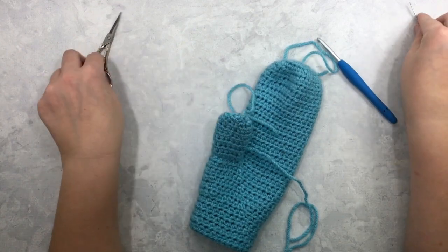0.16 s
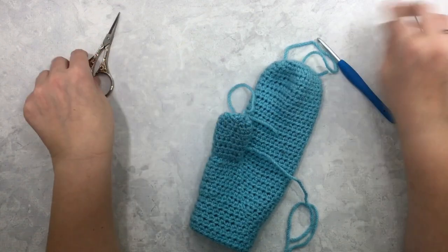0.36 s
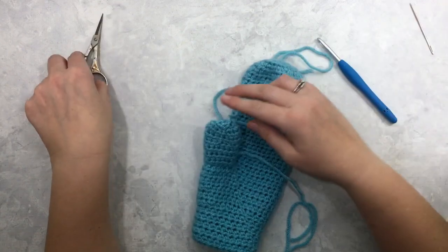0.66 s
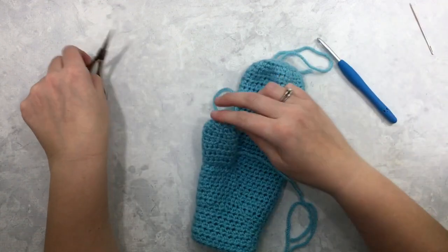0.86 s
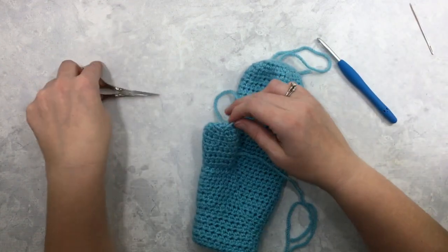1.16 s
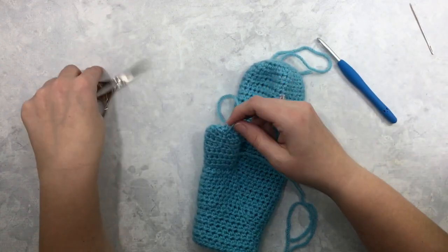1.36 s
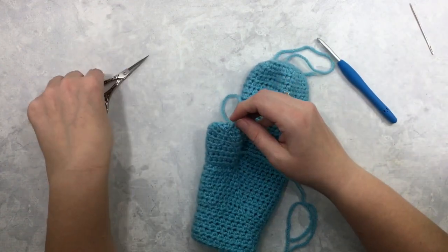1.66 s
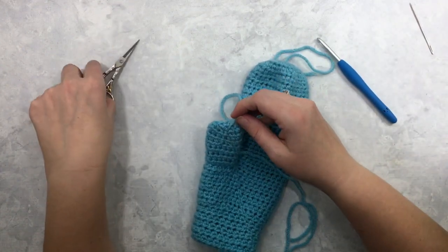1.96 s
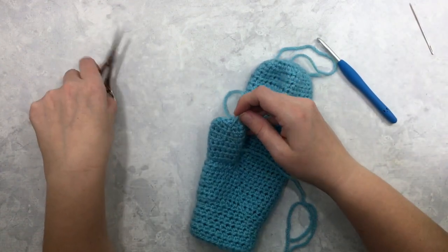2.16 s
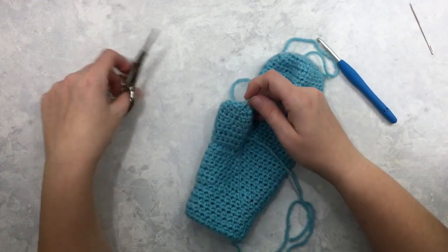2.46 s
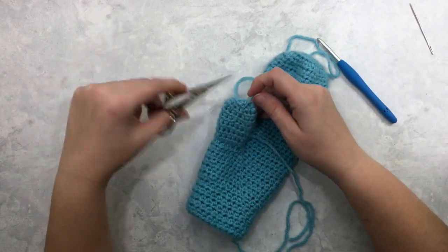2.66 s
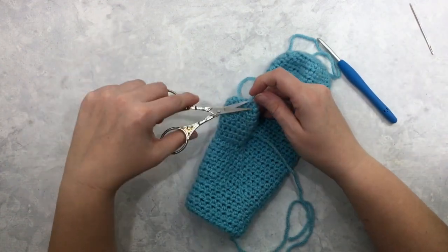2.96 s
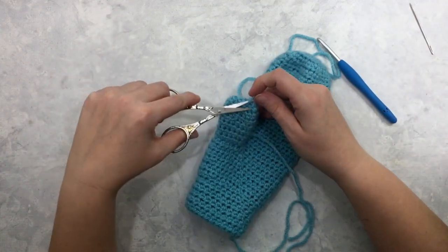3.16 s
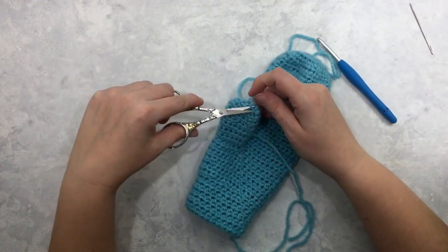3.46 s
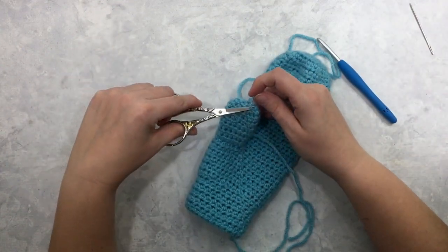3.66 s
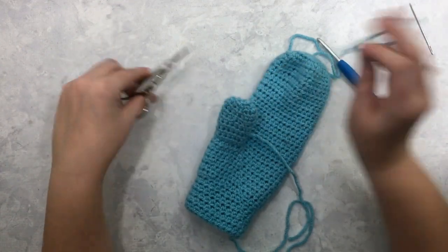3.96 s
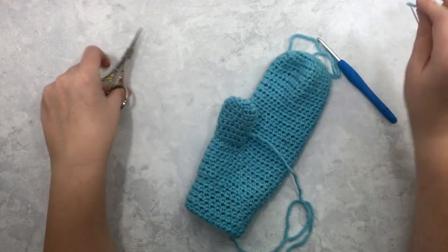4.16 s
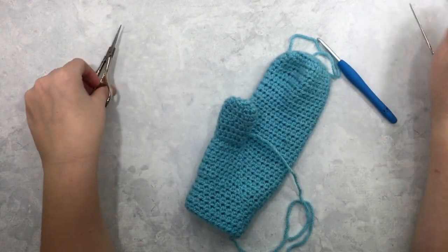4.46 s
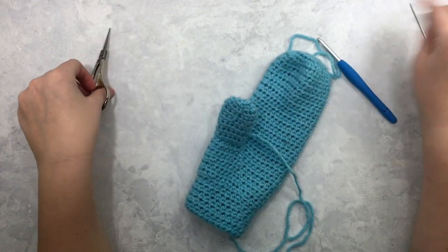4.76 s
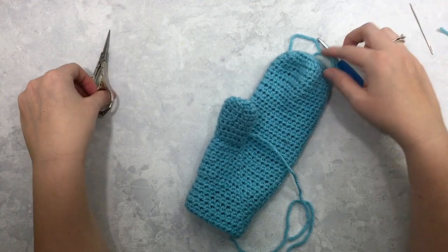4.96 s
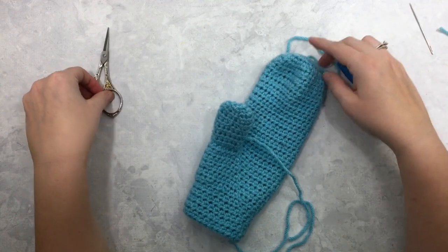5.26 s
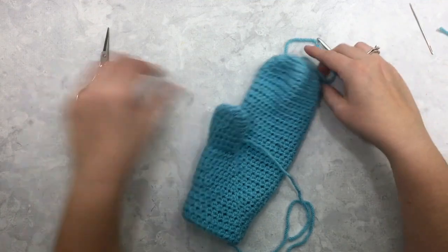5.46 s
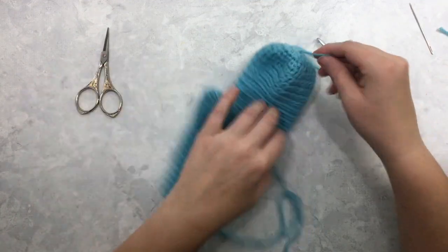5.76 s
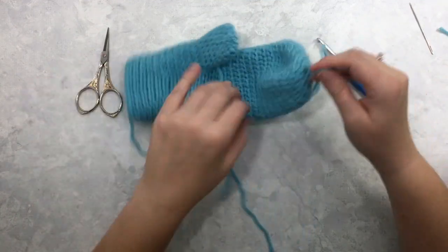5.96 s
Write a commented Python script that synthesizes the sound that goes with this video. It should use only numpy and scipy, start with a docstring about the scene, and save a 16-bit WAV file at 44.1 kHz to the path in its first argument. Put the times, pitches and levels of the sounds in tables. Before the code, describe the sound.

In a quiet room, close to the microphone, small steel scissors are fumbled on a hard tabletop with chinks, clacks, short scrapes and dull thumps, while hands softly pat a crocheted mitten. The handling thins out, near silence follows with faint wool cuts, then a single sharp, high snip. After another lull the scissors clack down on the table, and the mitten is rustled and patted.

```python
"""Small steel scissors are picked up from a table, snip a strand of yarn and are laid down again.
Each blow sums noise bursts with damped modes of steel and table top; scrapes drive modes with friction noise.
The snip is shaped noise ringing the blades; hands pat and brush a crocheted mitten as soft pushes and slips.
A quiet room of filtered noise hums behind, with near reflections and a short diffuse tail on the sources.
The close microphone's gain control ducks after each loud knock and recovers."""
import sys
import numpy as np
from scipy import signal
from scipy.fft import rfft, irfft
from scipy.io import wavfile
from scipy.ndimage import uniform_filter1d

SR = 44100
rng = np.random.default_rng(int(sys.argv[2]) if len(sys.argv) > 2 else 0)


def materialize(psi):
    """Save the field psi as 16-bit PCM at rate SR to the path in sys.argv[1].

    A 1-D psi becomes a single channel; in a 2-D psi each row is a channel.
    """
    bounded = np.clip(np.atleast_2d(psi).T, -1, 1)
    quanta = np.round(bounded * 32767).astype(np.int16)
    wavfile.write(sys.argv[1], SR, quanta)


N = 269010
TIME = np.arange(N) / SR  # s

# modes of the table top, deep ones first: f/Hz, relative level/dB, t60/s
TABLE_MODES = [(107, -6, .17), (131, 1, .19), (155, -4, .13), (197, -6, .12), (230, -2, .16),
               (270, -8, .14), (312, -1, .19), (345, -6, .28), (424, -11, .13), (512, -4, .1),
               (541, -1, .15), (625, 0, .14), (670, -9, .07), (726, -1, .15), (825, -11, .13),
               (873, -13, .11), (920, -14, .11), (1040, -19, .11), (1232, -22, .11)]
# colour of the table's quickly damped modes: f/Hz, gain/dB
BODY_COLOUR = [(150, -18.5), (300, -2.5), (550, 6.5), (750, -1.5), (950, -6.5), (1300, -15.5), (2200, -17),
               (5000, -51.5)]


def amp(db):
    """Level to amplitude: 20 dB is a factor of ten."""
    return 10 ** (np.asarray(db) / 20)


def unit(x):
    """Power normalization: scales to rms 1."""
    return x / np.sqrt(np.mean(x ** 2) + 1e-20)


def crest(x, size):
    """Short-time power normalization: the loudest stretch of size samples gets rms 1."""
    power = uniform_filter1d(x ** 2, size, mode="constant")
    return x / np.sqrt(power.max() + 1e-20)


def read(points, hz):
    """Interpolation of a spectrum along a logarithmic frequency axis."""
    f, value = np.transpose(points)
    return np.interp(np.log(hz + 1), np.log(f + 1), value)


def add(mix, s, sound):
    """Superposition: mixes a sound in at time s."""
    part = mix[max(round(s * SR), 0):][:len(sound)]
    part += sound[:len(part)]


def colour(x, points, size=4096):
    """Minimum-phase filtering: the log gain and its Hilbert transform give a causal response."""
    hz = abs(np.fft.fftfreq(size, 1 / SR))
    log_gain = np.log(amp(read(points, hz)))
    spectrum = np.exp(np.conj(signal.hilbert(log_gain)))
    taps = np.fft.ifft(spectrum).real[:size // 2]
    return signal.fftconvolve(x, taps)[:len(x)]


def low_cut(x, hz, order):
    """High-pass filtering: removes the bass below hz."""
    return signal.sosfilt(signal.butter(order, hz, "high", fs=SR, output="sos"), x)


def burst(points, decay_s, size=8192):
    """High modal density: many quickly damped modes act as decaying noise with the given colour."""
    decay = np.exp(-np.arange(size) / SR / decay_s)
    return colour(rng.standard_normal(size) * decay, points)


def ring(modes, spot_db=0, spot_phase=0, detune=0.011, size=22050):
    """Modal decay: the spot struck sets each mode's strength and phase."""
    t = np.arange(size) / SR
    out = np.zeros(size)
    # each mode's pitch varies a little at random, so repeated blows sound less tonal
    spots = (2 * rng.random((len(modes), 3)) - 1) * [spot_db, spot_phase, detune]
    for (hz, db, t60), (more_db, phase, shift) in zip(modes, spots):
        decay = amp(db + more_db - 60 * t / t60)
        build_up = np.minimum(2 * hz * t, 1)  # half a cycle
        out += decay * build_up * np.sin(2 * np.pi * hz * (1 + shift) * t + phase)
    return out


def excite(drive, modes):
    """Forced vibration: the drive passes through a modal response of unit energy."""
    response = np.diff(ring(modes, spot_phase=np.pi, detune=0))
    return signal.fftconvolve(drive, response / np.linalg.norm(response))[:N]


def grains(per_s, spread_db, smooth):
    """Stick-slip friction: tiny slips of uneven size over a smooth hiss."""
    happens = rng.random(N) < per_s / SR
    size = amp(spread_db * np.minimum(rng.exponential(1, N), 4))
    slips = happens * rng.choice([-1, 1], N) * size
    return unit(unit(slips) + smooth * rng.standard_normal(N))


def stroke(s, swell, fade):
    """Transient load: pressure builds up to time s and lets go, each side a half Gaussian."""
    return np.exp(-((TIME - s) / np.where(TIME < s, swell, fade)) ** 2)


def pressures(rows):
    """Incoherent addition: overlapping strokes add in power, one gain curve per level column."""
    shapes = np.array([stroke(*row[:3]) for row in rows])
    levels = amp(np.array(rows)[:, 3:])
    return np.sqrt(levels.T ** 2 @ shapes ** 2)


def air():
    """Stationary noise: steady room rumble and microphone hiss."""
    # background spectrum: f/Hz, relative level/dB
    air_colour = [(15, -39.5), (25, -8.5), (55, -1), (129, -5), (169, -14.5), (313, -22.5), (421, -26.5),
                  (684, -26), (782, -29), (2120, -33), (2490, -32.5), (2700, -35.5), (10600, -40),
                  (13500, -38.5), (15500, -44)]
    hz = np.fft.rfftfreq(N, 1 / SR)
    spectrum = rfft(rng.standard_normal(N)) * amp(read(air_colour, hz))
    return amp(-50.5) * unit(irfft(spectrum, N))


def room(x, tail_db=-15, size=22050):
    """Reverberation: a few near reflections and a diffuse tail whose decay depends on frequency."""
    # decay of the tail: f/Hz, t60/s
    decay_times = [(100, 0.62), (400, 0.32), (1500, 0.28), (5000, 0.2), (15000, 0.15)]
    # near reflections: delay t/s, level/dB
    reflections = [(.0062, -25), (0.0109, -18), (0.0176, -22.5)]
    hz, t, z = signal.stft(rng.standard_normal(size), SR, nperseg=256)
    decay = amp(-60 * t / read(decay_times, hz)[:, None])
    tail = signal.istft(z * decay, SR, nperseg=256)[1]
    tail *= np.minimum(np.arange(len(tail)) / SR / 0.013, 1)  # builds up over 13 ms
    tail *= amp(tail_db) / np.linalg.norm(tail)
    for s, db in reflections:
        add(tail, s, amp(db) * np.array([.5, .5]))  # the two-sample mean loses the top treble
    return x + signal.fftconvolve(x, tail)[:N]


def rustle(points, effort, rest_db, slips, uneven_db):
    """Modulated friction: fibres or skin catch and slip under an unsteady hand."""
    slow = uniform_filter1d(uniform_filter1d(rng.standard_normal(N), 700), 500)
    waver = amp(uneven_db * unit(slow))
    pressure = np.hypot(effort, amp(rest_db))  # the hands never hold quite still
    return unit(colour(slips, points)) * pressure * waver


def hands():
    """Sliding friction: sparse slips of wool fibres and denser slips of skin on the table."""
    # sweeps: t/s of the peak, swell t/s, fade t/s, wool level/dB, skin level/dB (before wavering)
    sweeps = [(0.03, 0.039, 0.092, -59, -59), (0.23, 0.066, 0.085, -60, -55.5),
              (0.45, 0.051, 0.046, -54, -57), (0.58, 0.051, 0.028, -55.5, -51.5),
              (0.66, 0.071, 0.025, -52.5, -57.5), (0.9, 0.48, .15, -72, -60),
              (1.32, 0.025, 0.068, -67, -41), (1.9, 0.47, .35, -89, -60.5), (2.38, 0.21, 0.13, -58.5, -49),
              (2.74, 0.15, 0.09, -59, -62), (4.185, 0.27, 0.0098, -57.5, -56),
              (4.96, .15, .06, -62.5, -64.5), (5.19, 0.11, .05, -58, -57.5), (5.522, .008, 0.031, -65, -48),
              (5.61, 0.033, 0.076, -61, -78), (5.92, 0.16, 0.29, -51, -69)]
    # colour of rustling wool: f/Hz, gain/dB
    wool_colour = [(150, -2.5), (600, -11), (1500, -1.5), (3000, -2), (4500, 1), (5900, 2.5), (8000, -2),
                   (11000, -5), (16000, -14)]
    # colour of skin sliding on the table: f/Hz, gain/dB
    skin_colour = [(100, 10.5), (350, 12), (800, 0.5), (1500, 3.5), (2800, -4), (4000, -1.5), (7000, -41),
                   (15000, -15)]
    on_wool, on_table = pressures(sweeps)
    fibre_slips = grains(per_s=600, spread_db=3.5, smooth=0.9)
    skin_slips = grains(per_s=2400, spread_db=1.0, smooth=1.5)
    wool = rustle(wool_colour, on_wool, rest_db=-72, slips=fibre_slips, uneven_db=-1.36)
    skin = rustle(skin_colour, on_table, rest_db=-66.5, slips=skin_slips, uneven_db=2.6)
    return wool + skin


def pats(wood_db=-6, damping=1.44):
    """Soft impact: a push of about one cycle scuffs dully and drives the table's low modes."""
    # fingers and wool landing: t/s, push level/dB, push f/Hz
    landings = [(0.069, -36.5, 129), (0.206, -41.5, 198), (0.566, -40, 170), (0.734, -44, 190),
                (0.999, -30.5, 142), (1.238, -27, 199), (1.421, -29.5, 133), (1.456, -30.5, 142),
                (1.712, -33.5, 151), (1.982, -32.5, 151), (4.95, -38.5, 194), (5.267, -29, 129),
                (5.730, -34.5, 180), (5.747, -42, 258), (5.799, -33.5, 183), (5.866, -35, 141),
                (5.928, -27, 270), (5.95, -39, 102), (6.019, -34.5, 144)]
    # colour of wool scuffing the table: f/Hz, gain/dB
    scuff_colour = [(120, 8.5), (280, -24.5), (390, 10), (560, -8), (1200, -17), (2500, -27), (8000, -46)]
    out, wood = np.zeros(N), ring(TABLE_MODES)
    t = np.arange(len(wood)) / SR
    for s, db, hz in landings:
        push = t * hz * np.exp(-t * hz * damping) * np.sin(2 * np.pi * hz * t)
        after = signal.fftconvolve(push, wood)[:len(t)]
        # a quicker push scuffs more: 24 dB per octave up to 240 Hz, 2.5 dB under the push from there on
        scuff_db = db - 2.5 + 24 * min(np.log2(hz / 240), 0)
        add(out, s, amp(db) * crest(push, size=256))
        add(out, s, amp(db + wood_db) * crest(after, size=256))
        add(out, s, amp(scuff_db) * crest(burst(scuff_colour, decay_s=0.011), size=256))
    return out


def scrapes(uneven=0.3, handles_db=-9, ring_db=-4, body_db=-3):
    """Friction-driven vibration: steel slips hiss, sing in the handles, grate and drum in the table."""
    # steel sliding on table or steel: t/s of the peak, swell t/s, fade t/s, hiss level/dB,
    # table drive level/dB (before ring_db and body_db)
    slides = [(0.235, 0.042, .016, -52, -54), (0.468, 0.014, 0.0087, -55, -50.5),
              (0.877, .006, 0.0077, -44, -52), (0.978, 0.013, 0.025, -39.5, -48),
              (1.268, .008, 0.076, -46.5, -41), (1.47, 0.097, .04, -39.5, -50.5),
              (1.64, 0.017, 0.02, -49, -55), (1.995, 0.0062, 0.013, -29, -49),
              (2.108, .014, 0.01, -43, -58), (2.285, 0.032, 0.018, -56, -44),
              (2.375, 0.036, .016, -48.5, -41), (2.459, 0.0071, .012, -50, -39),
              (2.473, 0.0068, 0.0075, -39.5, -51), (4.44, 0.018, 0.02, -55.5, -64),
              (5.553, 0.024, 0.027, -42, -59)]
    # colour of the steel's hiss: f/Hz, gain/dB
    hiss_colour = [(300, -17), (1000, -17.5), (2800, -1), (4000, 2.5), (5400, 2), (7500, -5), (10500, -9.5),
                   (15500, -15)]
    # colour of steel grating on the surface: f/Hz, gain/dB
    grate_colour = [(400, -49), (1000, 5), (1450, 4), (2000, 4.5), (3000, -1), (5000, -0.5), (12000, -61)]
    # scissor handles, damped by the fingers: f/Hz, relative level/dB, t60/s
    handle_modes = [(3850, -3, .008), (4500, -2, .009), (5400, 0, .01), (6100, -2, .008), (7400, -6, .005)]
    # the steel sticks and lets go
    catch = np.exp(uneven * unit(uniform_filter1d(rng.standard_normal(N), 130)))
    slips = catch * grains(per_s=2600, spread_db=3.5, smooth=0.51)
    hiss, drum = pressures(slides)
    # the grating follows the hiss by 0.34 and the table drive by the rest
    grate = amp(-1) * hiss ** 0.34 * drum ** (1 - 0.34)
    steel = hiss * unit(colour(slips, hiss_colour))
    handles = amp(handles_db) * excite(slips * hiss, handle_modes)
    grating = grate * unit(colour(slips, grate_colour))
    table = amp(ring_db) * excite(slips * drum, TABLE_MODES)
    body = amp(body_db) * drum * unit(colour(slips, BODY_COLOUR))
    return steel + handles + grating + table + body


def knocks(chink_db=-1, ping_db=-2, ping_s=0.0022, body_db=-4, count=8):
    """Hard impact: a blow ticks, chinks in the steel, clacks and excites middle and deep table modes."""
    # steel on the table: t/s, steel level/dB (before chink_db and ping_db), table thump level/dB,
    # tick over steel level/dB, clack over steel level/dB, ping f/Hz
    blows = [(0.129, -40.5, -44, 6.5, -3, 4260), (0.1447, -40.5, -45.5, -7, -13, 4370),
             (0.3, -30.5, -36.5, -9, -5.5, 3600), (0.3229, -33.5, -54, -16, -13, 3720),
             (0.469, -43.5, -46, 1.5, -4.5, 3240), (0.734, -67, -35.5, -3, 1, 5000),
             (0.8566, -32.5, -24.5, -4, -10, 4580), (0.9249, -29.5, -22, -4, -9, 5540),
             (1.0376, -22.5, -23, -3, -15, 5030), (1.087, -47, -38, -8, -18, 4370),
             (1.1407, -33, -29, -2.5, -16.5, 5300), (1.2156, -27, -24, -1.5, -23, 3570),
             (1.2422, -38, -24.5, -5, -1, 5700), (1.251, -19, -19, -5.5, -1, 4260),
             (1.546, -41, -29.5, -3.5, -16, 4300), (1.637, -48.5, -47, -14, 1, 3210),
             (1.7013, -46.5, -36, 1.5, -10, 5360), (1.759, -50, -35.5, -12, 5, 3280),
             (1.98, -39, -36.5, -7, -9, 5450), (1.988, -35.5, -43, -3, -22, 5460),
             (2.0354, -43.5, -39.5, -7, -17, 5670), (2.213, -34.5, -25, -6, -12.5, 4360),
             (2.3268, -43.5, -35.5, -2, -10, 5600), (2.4724, -39.5, -38.5, -13, -0.5, 5750),
             (4.67, -56.5, -64, 8, -1, 4470), (4.948, -44.5, -38.5, -4, -16, 6200),
             (5.2628, -47.5, -44, -8, -4, 5160), (5.281, -25.5, -22.5, 1, -8, 4330),
             (5.3104, -35, -26.5, -6, -8, 6400), (5.334, -39.5, -33.5, -2, -2.5, 6370)]
    # colour of the tick: f/Hz, gain/dB
    tick_colour = [(800, -48), (2500, 8), (5000, -9), (8000, -6.5), (10000, -3.5), (13500, -0.5),
                   (16000, -7)]
    # colour of the steel's chink: f/Hz, gain/dB
    chink_colour = [(1000, -30), (2800, -6), (4200, 7), (5500, 6), (7000, 1.5), (9500, -2.5), (16000, -54)]
    # colour of the clack on the surface: f/Hz, gain/dB
    clack_colour = [(400, -11), (900, -2), (1100, -2.5), (1400, -7.5), (2050, 3), (2700, -13.5),
                    (4000, -8.5), (8000, -64)]
    out, t = np.zeros(N), np.arange(2048) / SR
    for s, steel, deep, tick, clack, hz in blows:
        # a harder blow is shorter, so middle modes grow faster than deep ones: 1.74 dB per dB,
        # equally loud at a thump of -18.5 dB
        middle = -18.5 + 1.74 * (deep + 18.5)
        # the grip picks out one short resonance of the steel
        ping = np.exp(-t / ping_s) * np.sin(2 * np.pi * hz * t)
        middle_ring = ring(TABLE_MODES[count:], spot_db=6.5, spot_phase=2.15)
        deep_ring = ring(TABLE_MODES[:count], spot_db=6, spot_phase=2.42)
        add(out, s, amp(steel + tick) * crest(burst(tick_colour, decay_s=0.0024), size=128))
        add(out, s, amp(steel + chink_db) * crest(burst(chink_colour, decay_s=0.0027), size=128))
        add(out, s, amp(steel + ping_db) * crest(ping, size=128))
        add(out, s, amp(steel + clack) * crest(burst(clack_colour, decay_s=0.008), size=256))
        # every spot of the table also has its own quickly damped modes
        add(out, s, amp(middle + body_db) * crest(burst(BODY_COLOUR, decay_s=0.022), size=256))
        add(out, s, amp(middle) * crest(middle_ring, size=256))
        add(out, s, amp(deep) * crest(deep_ring, size=256))
    return out


def snip(shut_s=3.7878, shut_db=-16.5, blades_db=-18):
    """Fracture and impact: fibres part between closing blades, which snap shut and ring briefly."""
    # blades shearing wool: t/s of the peak, swell t/s, fade t/s, level/dB
    cuts = [(3.06, 0.0033, 0.0058, -46), (3.140, .004, 0.0074, -51), (3.340, .004, .006, -53),
            (3.7855, 0.0049, 0.0046, -23.5)]
    # colour of the parting wool: f/Hz, gain/dB
    shear_colour = [(300, -45), (1500, -19), (3600, -14), (6500, -12.5), (10400, -9), (13000, -4),
                    (14800, -8), (16000, 0)]
    # colour of the blades snapping shut: f/Hz, gain/dB
    snap_colour = [(300, -30), (1700, -13.5), (2600, -12.5), (3550, -2), (5500, -11.5), (9000, -4),
                   (10400, -2), (12300, 5.5), (14000, -4), (16000, -5.5)]
    # scissor blades: f/Hz, relative level/dB, t60/s
    blade_modes = [(3530, 0, 0.046), (4620, -7, 0.12), (8800, -9, .05), (9130, -8, .05), (11300, -6, .06),
                   (11300, -2, 0.054), (11550, -8, .07), (12400, -5, 0.058), (13350, 4, 0.055),
                   (13120, -5, .07), (14000, -1, 0.055), (14535, -5, 0.056), (14960, 20, 0.06)]
    force = sum(amp(db) * stroke(s, swell, fade) for s, swell, fade, db in cuts)
    shear = force * unit(colour(rng.standard_normal(N), shear_colour))
    add(shear, shut_s, amp(shut_db) * crest(burst(snap_colour, decay_s=0.0026), size=96))
    return shear + amp(blades_db) * excite(shear, blade_modes)


def scene():
    """Superposition of scissors, hands and wool on the table, in the reverberant room."""
    # low cut: keeps the blows and pats free of deep rumble
    blows = low_cut(knocks() + pats(), hz=68.4, order=3)
    sources = blows + scrapes() + snip() + hands()
    return (room(sources) + air())[None]


def record(dry, threshold_db=-35, slope=0.43, recover_db_per_s=45, attack_s=0.079, edge_hz=15950):
    """Dynamic compression: gain eases down after loud blows and recovers; then the band is limited."""
    power_db = 10 * np.log10(abs(uniform_filter1d(dry[0] ** 2, 400)) + 1e-12)
    # peaks are held and fall at a steady rate
    fall = TIME * recover_db_per_s
    held_db = np.maximum.accumulate(power_db + fall) - fall
    over_db = np.maximum(held_db - threshold_db, 0)
    r = np.exp(-1 / (attack_s * SR))
    reduction_db = slope * signal.lfilter([1 - r], [1, -r], over_db)
    ducked = low_cut(dry / amp(reduction_db), hz=33.4, order=6)  # the microphone's low cut
    band_limit = signal.firwin(511, edge_hz, window=("kaiser", 9), fs=SR)
    return signal.oaconvolve(ducked, band_limit[None], "same")


dry = scene()
out = record(dry)
materialize(out)
```